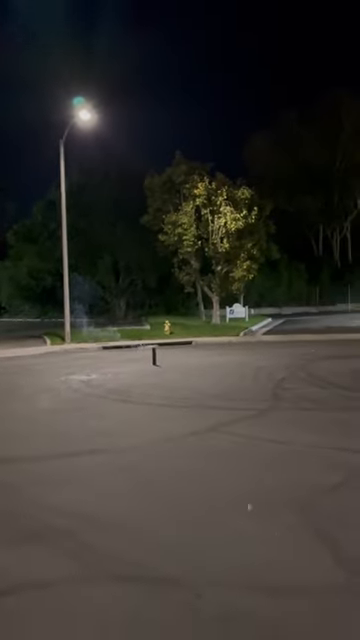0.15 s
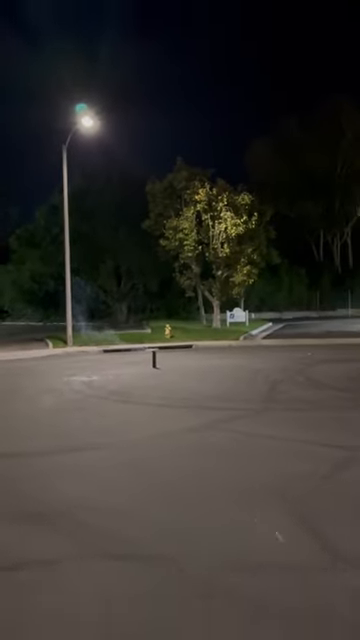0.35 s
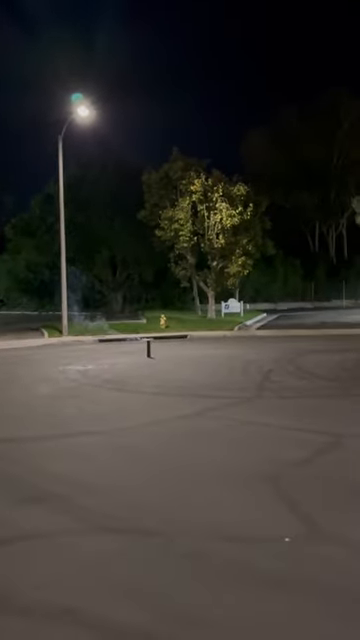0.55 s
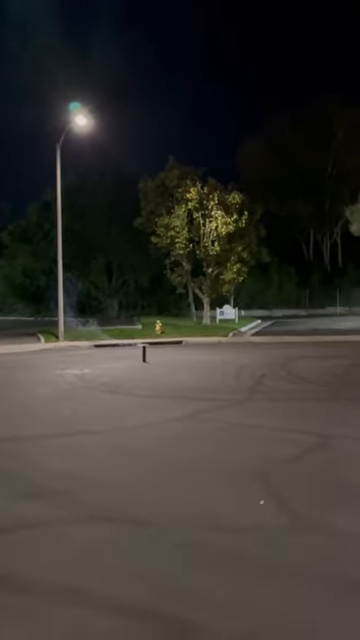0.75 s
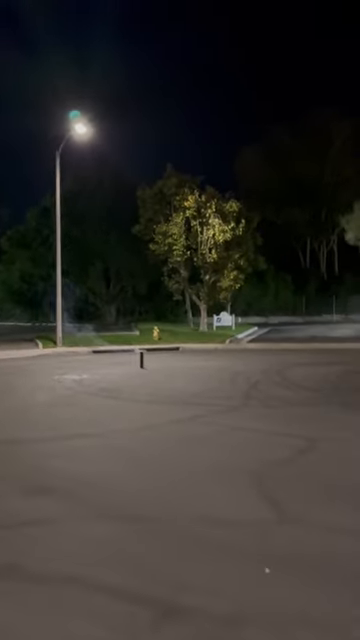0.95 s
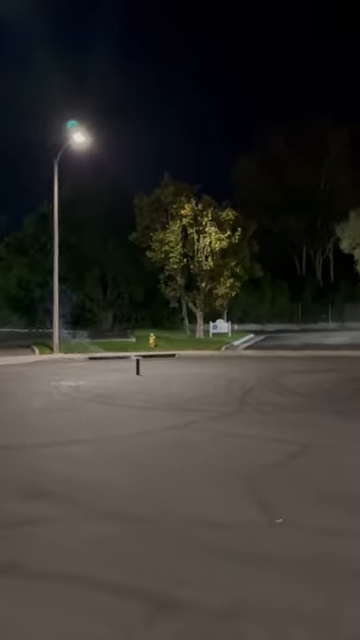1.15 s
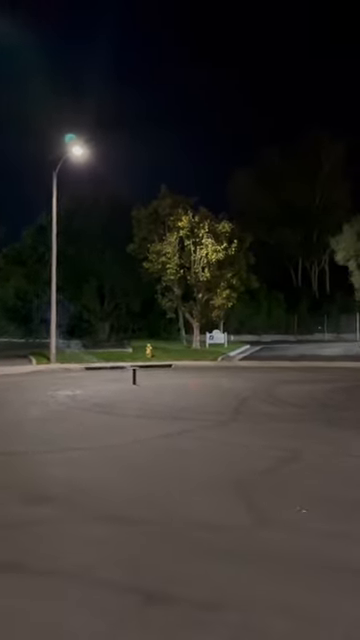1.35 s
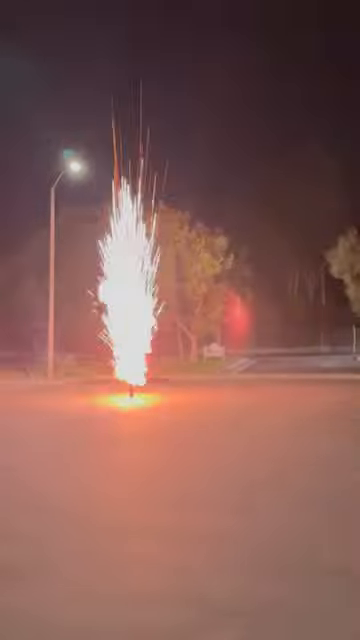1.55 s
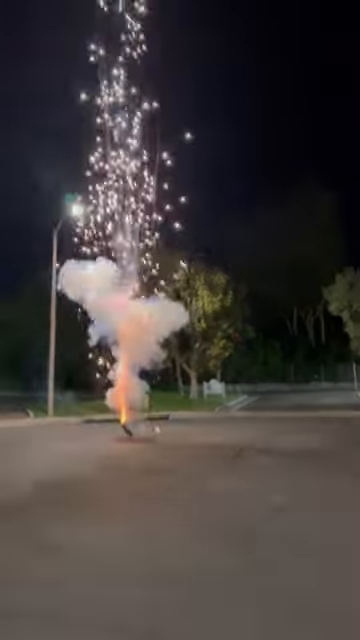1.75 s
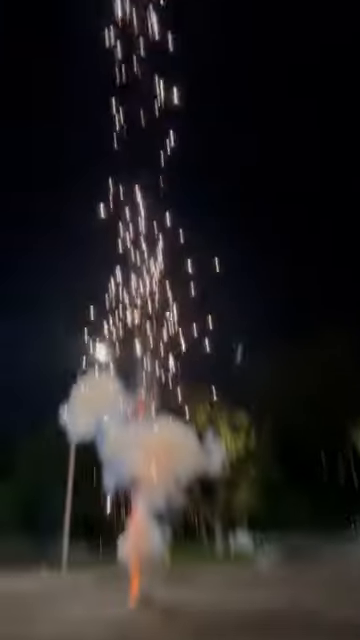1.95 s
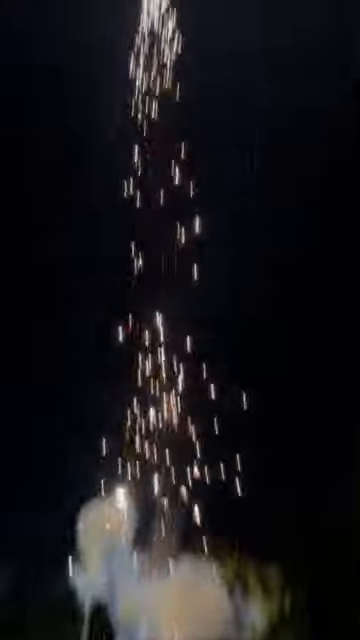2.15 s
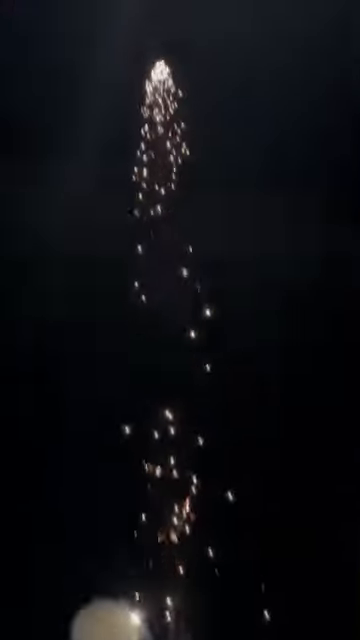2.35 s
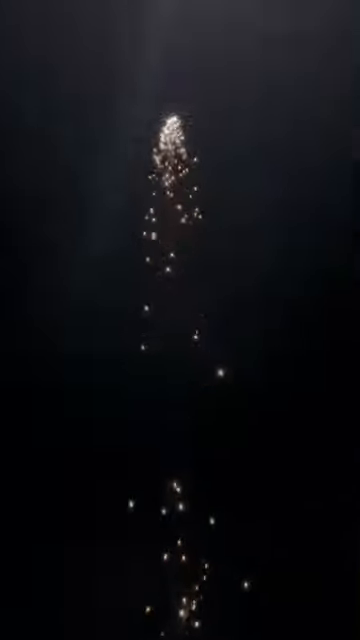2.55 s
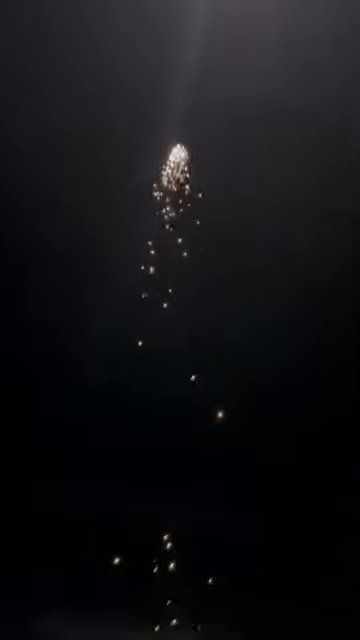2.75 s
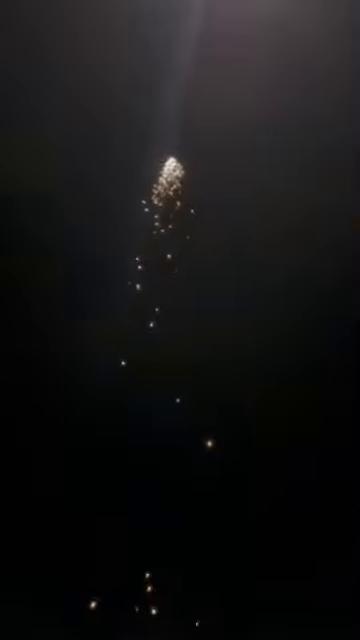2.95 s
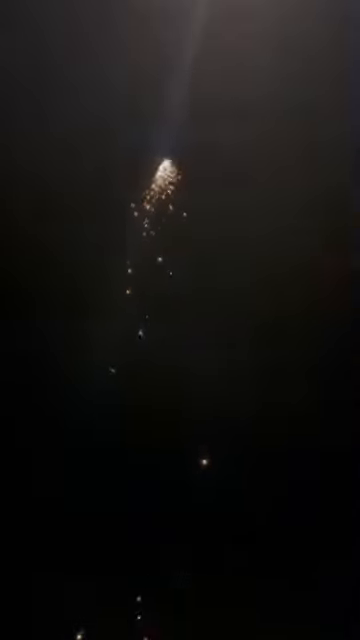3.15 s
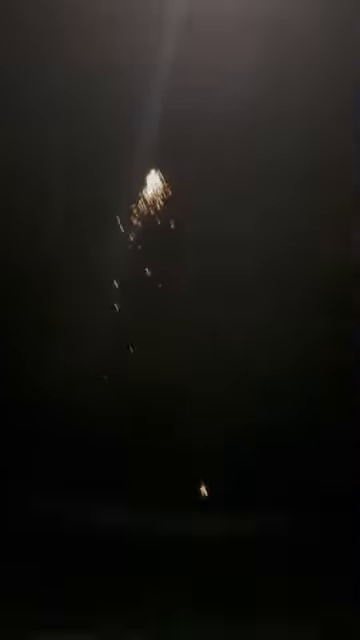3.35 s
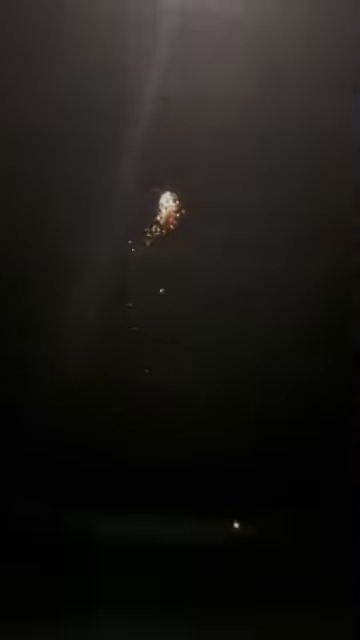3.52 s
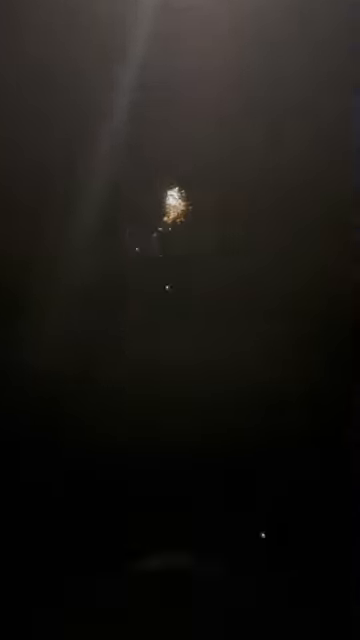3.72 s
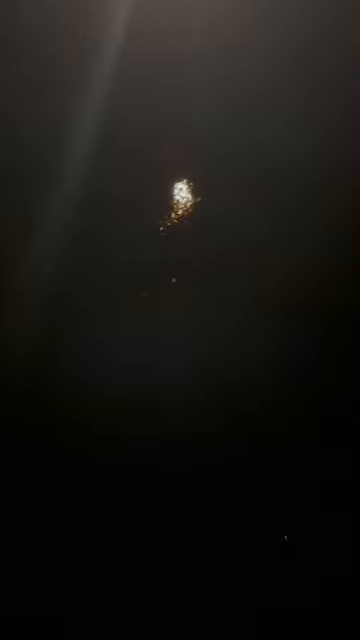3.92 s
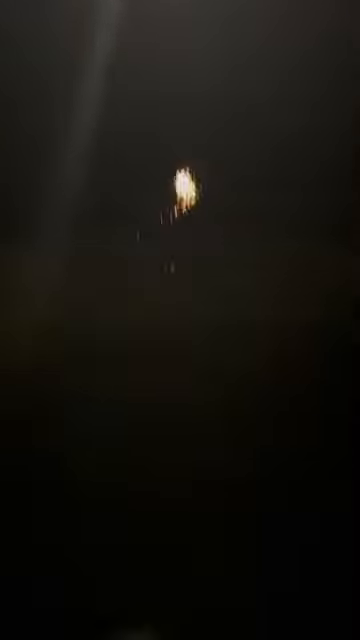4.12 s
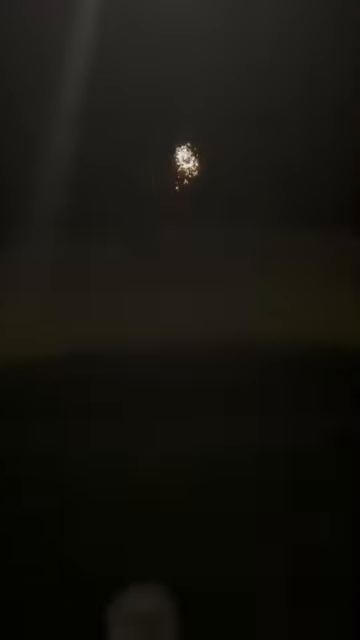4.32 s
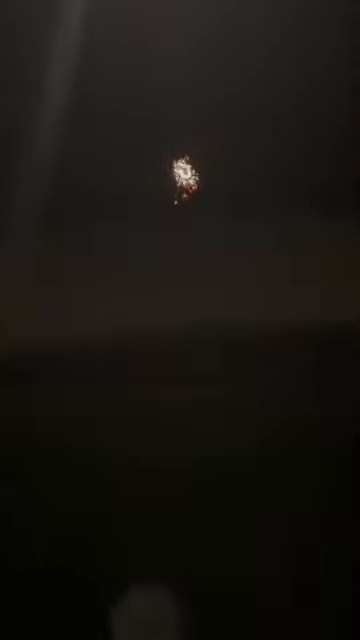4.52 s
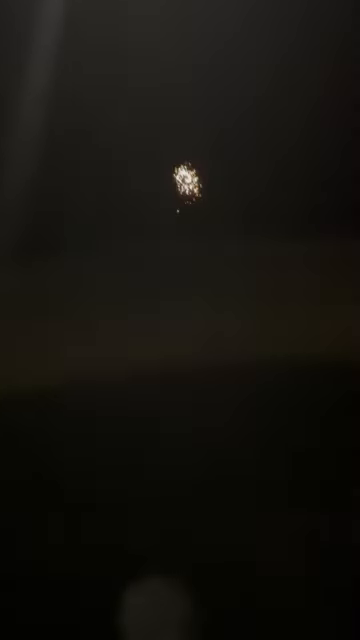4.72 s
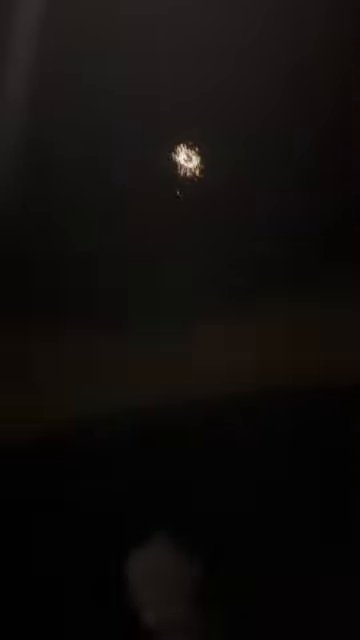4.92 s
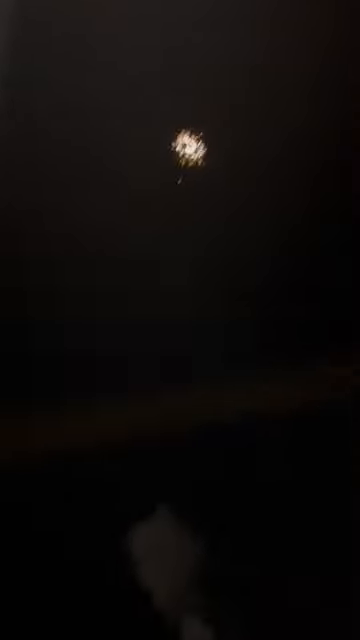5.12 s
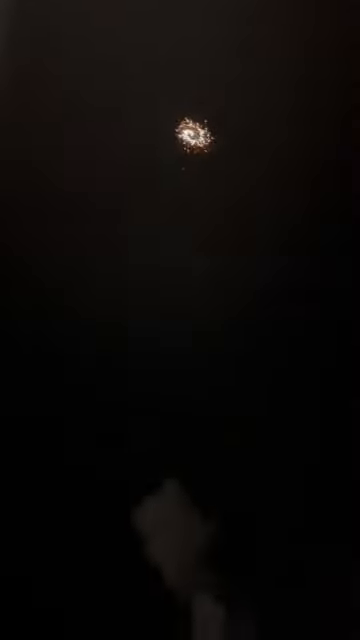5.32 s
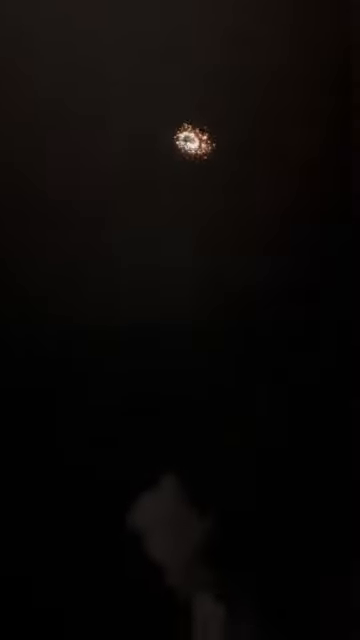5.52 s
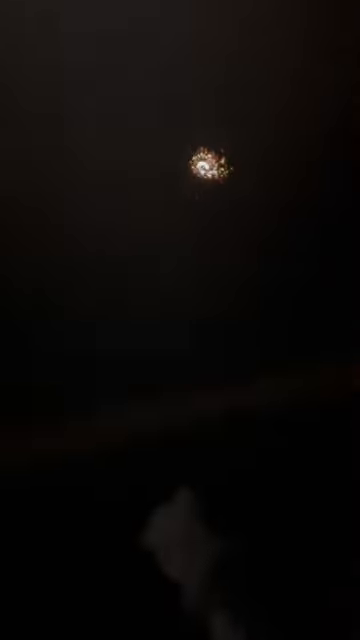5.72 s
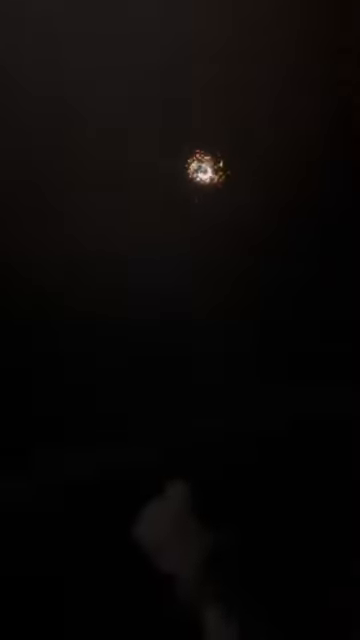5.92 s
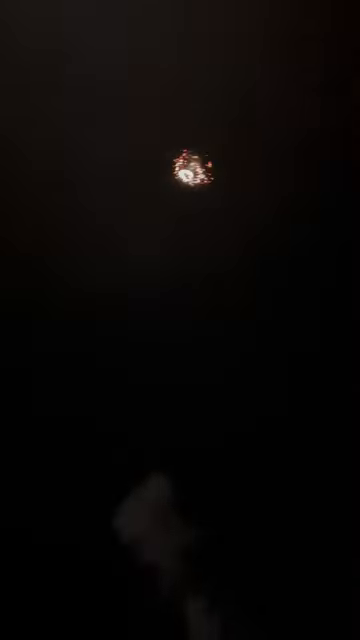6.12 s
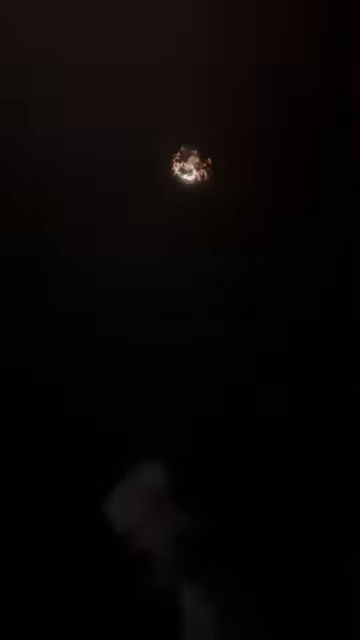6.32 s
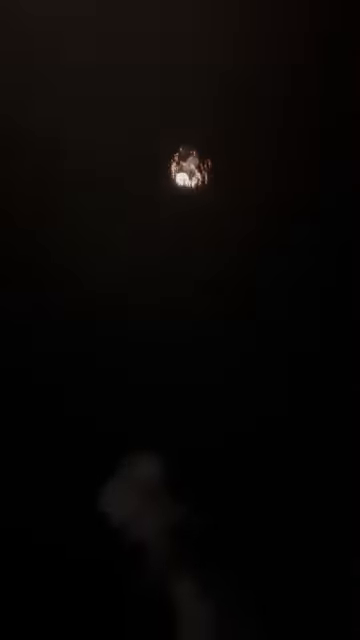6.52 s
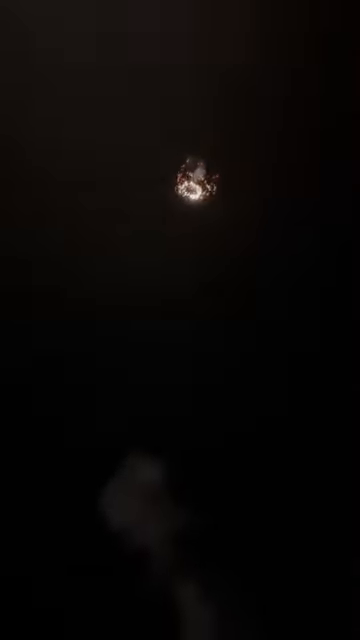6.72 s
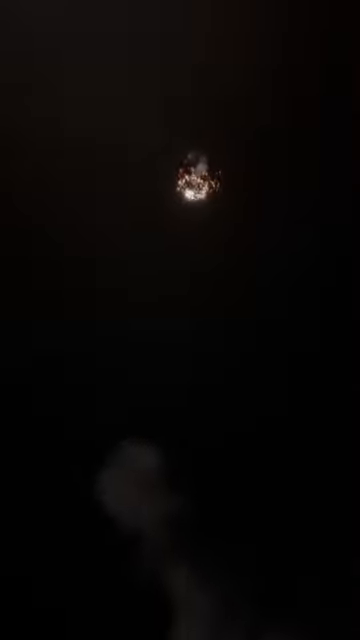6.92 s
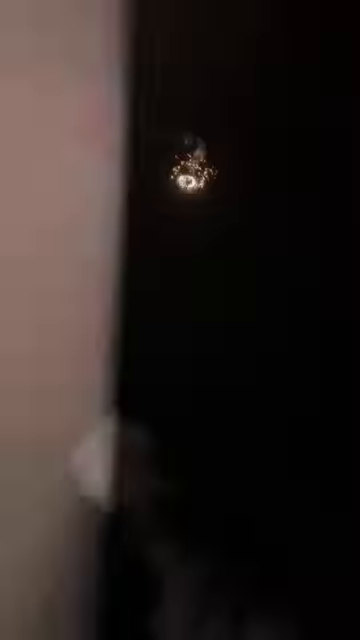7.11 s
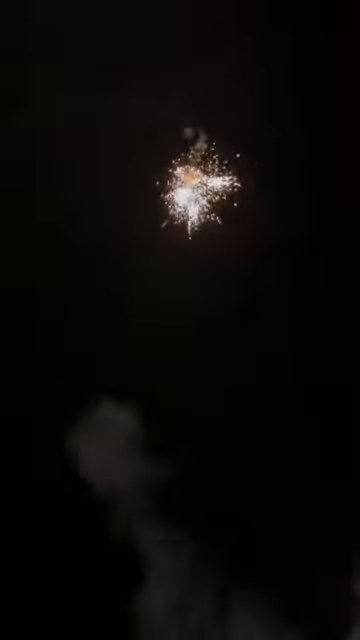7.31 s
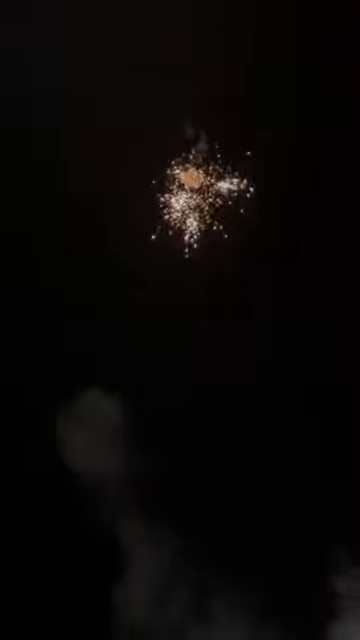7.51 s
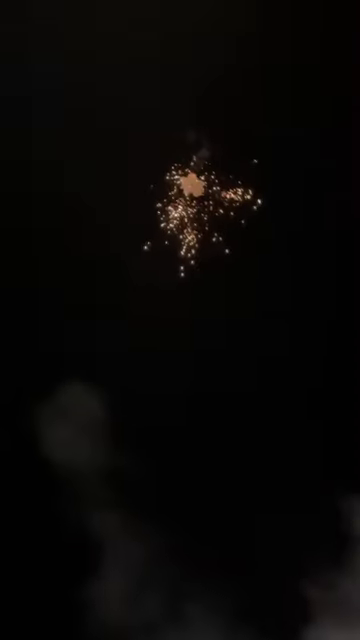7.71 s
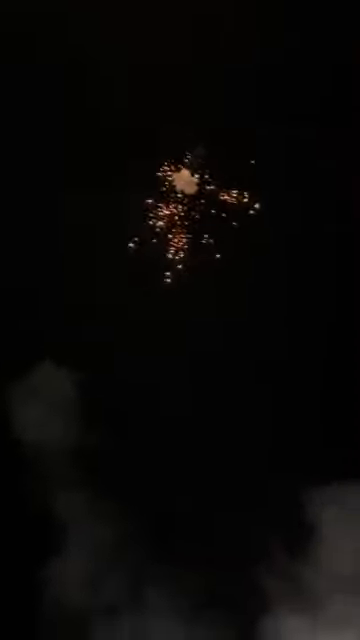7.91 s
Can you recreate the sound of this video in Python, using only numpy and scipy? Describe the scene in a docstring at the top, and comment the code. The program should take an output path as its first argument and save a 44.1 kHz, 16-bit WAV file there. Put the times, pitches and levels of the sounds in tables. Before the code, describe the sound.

A quiet paved street at night, heard on a stereo phone some distance away: soft wind rumble, a distant wash, dull knocks near 0.2 and 0.6 s and small spark ticks. At 1.5 s a mortar fires with a sharp crack, a second harder one moments later, and a clipped thump. Noise rolls back from trees and houses, losing brightness over the next second or two, with a low slap around 2.7 s. From about 1.65 s a shrill whistle climbs away, near 3 kHz, fluttering fast and rough, then smoother with a slowing warble. It sinks toward 1.6 kHz, weaker around 4.2 s, then stronger and brighter with gas hiss after 5.5 s. A faint knock comes near 6.8 s. At 7.4 s the whistle ends in a crack and deep thump; heavy low rumble swells and is still rolling at the end, about 8 s.

```python
"""Paved street at night, light wind, a phone with two microphones some way off: first a few dull knocks and sparks.
At 1.5 s a firework shell leaves its mortar; shock fronts crack and thump, and noise rolls back from trees and houses.
The shell tumbles upward on a pulsing whistle with overtones and jet hiss, sinking as the fuel burns down the tube.
At 7.4 s it bursts overhead with a new crack, thump and roll; the phone rounds the blast peaks and cuts the top."""
import sys
import numpy as np
from scipy import signal
from scipy.fft import rfft, irfft, next_fast_len
from scipy.io import wavfile
from scipy.ndimage import uniform_filter1d

SR = 44100
rng = np.random.default_rng(int(sys.argv[2]) if len(sys.argv) > 2 else 0)


def transcribe(signal):
    """Save signal, clipped to [-1, 1], as a 16-bit WAV file at the path in sys.argv[1]."""
    frames = np.atleast_2d(signal).T
    limited = np.clip(frames, -1, 1)
    pcm = np.round(limited * 32767).astype(np.int16)
    wavfile.write(sys.argv[1], SR, pcm)


N = 351036
T = np.arange(N) / SR


def undb(db):
    """Decibels to gain."""
    return 10 ** (np.asarray(db) / 20)


def unit(x):
    """Scale to rms 1."""
    return x / np.sqrt(np.mean(x ** 2) + 1e-18)


def peak_one(x):
    """Scale to a peak of 1."""
    return x / np.abs(x).max()


def curves(rows, t):
    """Each column of a table, joined by straight lines in time."""
    s, *columns = np.transpose(rows)
    return [np.interp(t, s, c) for c in columns]


def response(points, size):
    """Gain at each frequency of a transform of this size."""
    hz, db = np.transpose(points)
    bins_hz = np.arange(size // 2 + 1) * SR / size
    return undb(np.interp(np.log(bins_hz + 1), np.log(hz), db))


def colour(x, points):
    """Filter a sound by a table of gains over frequency."""
    size = next_fast_len(x.shape[-1], True)
    return irfft(rfft(x, size) * response(points, size), size)[..., :x.shape[-1]]


def band(x, lo_hz, hi_hz, order=2):
    """Band-pass filter."""
    edges_hz = [lo_hz, min(hi_hz, SR / 2 - SR / 20)]
    return signal.sosfilt(signal.butter(order, edges_hz, "band", fs=SR, output="sos"), x)


def walk(rate, size=N):
    """Random wandering with a spread near 1, through this many random points a second."""
    u = np.arange(size) / SR * rate
    knots = rng.standard_normal(N // 20)
    return np.sqrt(3 / 2) * np.interp(u, np.arange(len(knots)), knots)


def add(out, s, x):
    """Mix a short sound in at time s."""
    i = int(s * SR)
    out[:, i:i + x.shape[-1]] += x[..., :N - i]


def wash(t, levels_db, points, spread, grain_db, fade_db):
    """Stereo noise as rumble, body and treble; the treble loses fade_db a second."""
    mid, side = rng.standard_normal((2, len(t))) * undb(grain_db * walk(350, len(t)))
    size = next_fast_len(len(t), True)
    hz = np.arange(size // 2 + 1) * SR / size
    wide = np.outer([1, -1], rfft(side, size) * response(spread, size))
    spectrum = (rfft(mid, size) + wide) * response(points, size)
    low = 1 / (1 + (hz / 180) ** 8)
    high = 1 - 1 / (1 + (hz / 3300) ** 4)
    rumble, body, treble = (irfft(spectrum * share, size)[:, :len(t)] for share in (low, 1 - low - high, high))
    rumble_db, body_db = levels_db
    # an even rumble without stray surges
    rumble = rumble / np.sqrt(uniform_filter1d((rumble ** 2).mean(0), size=SR // 14) + 1e-18)
    body_rms = np.std(band(body.mean(0), 200, 1400))
    upper = (body + treble * undb(-fade_db * (t - t[0]))) / body_rms
    return rumble * undb(rumble_db) + upper * undb(body_db)


# open street air around the launch, then under the climbing shell: time_s, wind_rumble_db, distant_wash_db
AIR_BEFORE = [(0, -42, -50), (.5, -46.5, -50.5), (.7, -42, -49), (1.45, -36.5, -51.5)]
AIR_AFTER = [(3.5, -56, -65), (4.1, -60, -68), (5.2, -58, -68), (5.9, -51.5, -61), (7.38, -47, -58)]
# tint of the air before, then under the climbing shell: frequency_hz, density_db_per_hz
AIR_COLOUR = [(22, -11.5), (55, 6.5), (130, -1), (300, -5.5), (600, -15.5), (1050, -18), (1600, -30.5),
              (3000, -36.5), (5000, -48), (7500, -49), (10000, -67.5)]
HUSH_COLOUR = [(22, -13.5), (54, 1), (114, -8.5), (243, -12), (352, -19), (580, -19.5), (1100, -26.5),
               (1600, -30), (3000, -33.5), (5000, -40.5), (7500, -43), (10000, -62.5)]
# how much the air differs at the two microphones: frequency_hz, side_minus_mid_db
AIR_SPREAD = [(60, -13.5), (200, -23), (380, -13), (700, -5.5), (2400, -9.5), (4400, 3.5), (8000, 2.5)]


def night_air():
    """Wind rumble and a distant wash, both noise; they sink after the launch and slowly come back."""
    handover = np.interp(T, [1.5, 3.2], [0, 1])
    before = wash(T, curves(AIR_BEFORE, T), AIR_COLOUR, AIR_SPREAD, grain_db=1.0, fade_db=-2.0)
    after = wash(T, curves(AIR_AFTER, T), HUSH_COLOUR, AIR_SPREAD, grain_db=1.0, fade_db=2.0)
    return before * (1 - handover) ** 2 + after * handover


def noise_burst(t60_s):
    """A quarter second of noise that dies 60 dB in t60_s."""
    t = T[:SR // 4]
    return rng.standard_normal(len(t)) * undb(-60 * t / t60_s)


def knock(hz, t60_s):
    """A dying noise burst squeezed into a narrow band just below hz."""
    narrow = band(noise_burst(t60_s), hz / 1.254, hz * 0.997, order=1)
    return peak_one(band(narrow, hz / 3, hz * 3, order=2))


# dull knocks nearby and late slaps from far walls: start_s, body_peak_db, pitch_hz, noise_t60_s, edge_db (re body)
KNOCKS = [(.157, -35.5, 332, 0.19, -4.5), (.626, -34.5, 161, 0.072, -18), (.664, -31, 427, 0.15, -24),
          (2.67, -28, 182, 0.41, -24), (2.953, -37, 400, .04, -1), (3.111, -34, 598.6, .08, -3),
          (6.332, -52.5, 500, .04, -11), (6.786, -38.5, 422, 0.092, -18)]
EDGE_RATIO, EDGE_T60_S = 1.8, 0.063  # the edge of a knock has its own pitch, above the body, and decay


def knocks():
    """Each knock or slap is a narrow noise body with a higher edge on top."""
    out = np.zeros((2, N))
    for s, db, hz, t60_s, edge_db in KNOCKS:
        edge = undb(edge_db) * knock(EDGE_RATIO * hz, EDGE_T60_S)
        add(out, s, undb(db) * (knock(hz, t60_s) + edge))
    return out


# the loudest sparks: start_s, peak_db, pitch_hz
SPARKS = [(.252, -49.5, 4120), (.3462, -45.5, 3940), (.836, -42, 4070), (2.175, -50, 3000),
          (2.31, -51, 6540)]
TRAIL_S, TRAIL_DB, TRAIL_HZ = (2.4, 3.6), -62, 5800  # fainter sparks in the trail of the shell


def sparks():
    """Each spark is a tiny snap of noise, with four fainter ones at random moments in the trail."""
    out = np.zeros((2, N))
    trail = [(s, TRAIL_DB, TRAIL_HZ) for s in rng.uniform(*TRAIL_S, size=4)]
    for s, db, hz in list(SPARKS) + trail:
        snap = band(noise_burst(.007), hz / 3.2, hz * 0.99)
        snap = colour(snap, [(7500, 5), (11000, -25.0)])  # the air takes the top
        add(out, s, undb(db) * peak_one(snap))
    return out


# stronger echoes from single houses and stands of trees: peak_s, rumble_db, body_db, decay_s
ECHOES = [(1.625, -19, -49, 0.032), (1.66, -26, -26.5, .04), (1.745, -24, -42.5, .05),
          (2.0, -31.5, -33.5, 0.14), (2.289, -31.5, -54, 0.088), (2.87, -44, -52.5, 0.4),
          (7.487, -19, -30, 0.029), (7.667, -17, -30.5, 0.055), (7.808, -14, -28.5, 0.052),
          (7.942, -13.5, -37, 0.021)]


def roll(t, rumble_db, rumble_fall_db, body_db, body_fall_db):
    """Levels of rumble and body in dB: a steady slope, with a swell for each stronger echo."""
    age = t - t[0]
    power = undb([rumble_db - rumble_fall_db * age, body_db - body_fall_db * age]) ** 2
    for s, low_db, mid_db, decay in ECHOES:
        # an echo builds up in 0.4 of its decay time
        swell = np.exp(-np.maximum((s - t) / .4, t - s) / decay)
        power = power + np.outer(undb([low_db, mid_db]), swell) ** 2
    return 10 * np.log10(power)


# steady roll behind each blast (a negative fall climbs): rumble_db, rumble_fall_db_per_s, body_db, body_fall_db_per_s
LAUNCH_ROLL = (-26, 15.5, -26, 24)
BURST_ROLL = (-23, -4.5, -30.5, -9)
# tint of the street's answer to each blast: frequency_hz, density_db_per_hz
LAUNCH_COLOUR = [(22, -17), (60, 10.5), (110, -2), (200, 1.5), (330, -15), (600, -10.5), (1200, -20.5),
                 (3000, -20), (4200, -28), (6500, -28.5), (9300, -38.5), (11000, -77.5)]
BURST_COLOUR = [(22, -24), (55, 11), (90, 14.5), (170, -4.5), (300, -18.5), (600, -25), (1200, -33),
                (3000, -36), (4200, -40), (6500, -40.5), (9300, -51), (11000, -76)]
# how much the echoes differ at the two microphones: frequency_hz, side_minus_mid_db
SPREAD = [(60, -16.5), (200, -19.5), (380, -10.5), (700, -4), (1300, -9), (2400, -5.5), (4400, 1.5),
          (8000, 4)]


def echoes():
    """Both blasts roll back from ground, trees and houses as noise, duller the further it has travelled."""
    out = np.zeros((2, N))
    launch_s, burst_s = CRACKS[0][0], CRACKS[-1][0]
    t = T[int(launch_s * SR):][:5 * SR // 2]
    # only the ground answers at first
    build = np.interp(t, [1.503, 1.508, 1.575, 3.1, 3.5, 4], [.02, .5, 1, 0.98, 0.6, .2])
    grain_db = np.interp(t, [1.7, 2.4], [2.8, 1.3])  # the echoes grow denser and blend
    lumps_db = 0.9 * walk(25, len(t))  # the launch echoes come back in uneven bunches
    levels_db = roll(t, *LAUNCH_ROLL) + lumps_db
    add(out, launch_s, build * wash(t, levels_db, LAUNCH_COLOUR, SPREAD, grain_db, fade_db=26))
    t = T[int(burst_s * SR):]
    build = 1 - np.exp(-(t - t[0]) / 0.003)
    levels_db = roll(t, *BURST_ROLL)
    add(out, burst_s, build * wash(t, levels_db, BURST_COLOUR, SPREAD, grain_db=0.5, fade_db=38.5))
    return out


WHISTLE_ON_S, BURST_S = 1.64, 7.424
# the shell tumbles fast at first; the air brakes it toward a slow, steady spin
FACING_S, FACING_SPIN_HZ, FINAL_SPIN_HZ, BRAKE_S = 1.851, 16.878, 2.043, 1.1987


def turning():
    """Angle of the tumbling shell in radians, zero at FACING_S when its nozzle faces the listener."""
    age = np.maximum(T, WHISTLE_ON_S) - FACING_S
    extra_turns = (FACING_SPIN_HZ - FINAL_SPIN_HZ) * BRAKE_S * (1 - np.exp(-age / BRAKE_S))
    return 2 * np.pi * (FINAL_SPIN_HZ * age + extra_turns)


# whistle before the tumbling bends it: time_s, pitch_hz
PITCH = [(1.65, 3061), (1.9, 2891), (2.2, 2607), (2.9, 2405), (3.6, 2226), (3.95, 2238), (4.42, 2098),
         (4.75, 1999), (5.5, 1890), (5.75, 1873), (6.27, 1767), (6.5, 1799), (6.8, 1737), (6.97, 1652),
         (7.23, 1669), (7.4, 1577)]
# how hard the whistle burns: time_s, level_db, overtones_db
BLOW = [(1.65, -40.5, -3), (1.77, -39.5, -12), (1.95, -33, -25.5), (2.15, -38.5, -21.5), (2.85, -38, -30.5),
        (3.7, -41, -29.5), (4.2, -48, -25.5), (5.2, -45.5, -18.5), (5.4, -41.5, -15.5),
        (5.75, -37.5, -15.5), (5.95, -40, -17), (6.25, -33.5, -15.5), (6.55, -33.5, -14.5),
        (6.75, -37, -14), (7.1, -33.5, -15), (7.28, -38, -11), (7.4, -29.5, -14.5)]
# how ragged the burn is: time_s, pitch_jitter_share, level_flutter_db, unequal_pulses_db
RAGGED = [(1.7, .03, 4.5, 11.5), (2.15, .010, 3.5, 1), (3.7, .0055, 1, 1), (4.1, 0.0069, 2.5, -12),
          (5.2, .006, 2, -2), (6.5, 0.0048, 1, -10), (7.35, .0075, 1.5, 2.5)]
# where the shell stands from the phone: time_s, left_minus_right_db
BEARING = [(2.5, 1), (3.6, -2), (4.6, -2), (5.7, -1.5), (6.7, -1)]
# each turn of the nozzle toward the listener: time_s, pitch_swing_share, level_swing_db, overtone_swing_db
TUMBLE = [(2.2, .025, 2, -3.5), (3.0, 0.026, 0.2, 4), (3.85, 0.02, 1.4, 2.5), (4.35, .005, 2, 0.5),
          (5.7, 0.0033, 3.5, 0.5), (6.6, .004, 1.2, 0.5)]
# what the air and the microphone leave of the overtones: frequency_hz, gain_db
OVERTONE_COLOUR = [(3300, -2.5), (3800, -1), (4300, 1), (5200, 0.5), (6500, -6.5), (7400, -10), (8300, -21),
                   (9500, -26), (11000, -46.5)]
# hiss of the gas jet: frequency_hz, density_db_per_hz
JET_COLOUR = [(400, -14), (1000, -14), (2200, 12.5), (3300, 0.5), (4500, 4.5), (6300, -6), (8000, -15.5),
              (10000, -38.5)]
CREST, LEAN = .2, .25  # sharp crests and flat troughs; the pitch jumps up and slides back
SCATTER_T60_S = 1.1


def whistle():
    """Pulsing combustion sounds a lengthening tube; tumbling swings pitch and level, and gas hisses along."""
    pitch, = curves(PITCH, T)
    level_db, overtone_db = curves(BLOW, T)
    jitter, flutter_db, unequal_db = curves(RAGGED, T)
    pan_db, = curves(BEARING, T)
    swing, swell_db, bright_db = curves(TUMBLE, T)
    turn = turning()
    facing = np.cos(turn) + CREST * np.cos(2 * turn)
    warble = swing * (facing - LEAN * np.sin(2 * turn))
    hz = pitch * (1 + warble + jitter * walk(260) + 0.0037 * walk(35))
    # no two pulses are evenly spaced
    phase = 2 * np.pi * np.cumsum(hz) / SR + 7 * jitter * walk(1100)

    def carried_db(k):
        """What reaches the phone at k times the pitch."""
        return np.interp(k * pitch, *np.transpose(OVERTONE_COLOUR))

    overtones = 0
    for k, db in enumerate([-3.0, -9.5, -12.5, -15.0], 2):
        wander_db = 3.8 * walk(23) + flutter_db * walk(150)
        overtones = overtones + undb(db + carried_db(k) + wander_db) * np.sin(k * phase)
    # alternate pulses are unequal, which puts faint ragged lines between the harmonics
    halves = 0
    for k, db in zip([.5, 1.5, 2.5, 3.5], [-32.0, -31, -47.5, -40.0]):
        halves = halves + undb(db + carried_db(k)) * np.sin(k * phase)
    halves = walk(120) * halves
    upper = undb(overtone_db) * overtones
    tone = np.sqrt(2) * (np.sin(phase) + undb(bright_db * facing) * (upper + undb(unequal_db) * halves))
    # the jet spits unevenly and follows the overtones
    jet_db = -12.5 + overtone_db + 3.5 * walk(14)
    jet = undb(jet_db) * unit(colour(rng.standard_normal((2, N)), JET_COLOUR))
    burning = np.clip((T - WHISTLE_ON_S) / 0.044, 0, 1) * (T < BURST_S)
    gain = undb(level_db + swell_db * facing) * burning
    direct = tone * gain * undb(flutter_db * walk(90))
    # the trees scatter a faint tail, rich in overtones and strongest while the shell is low
    t = T[:SR]
    tail = rng.standard_normal((2, SR)) * undb(-60 * t / SCATTER_T60_S) * (t > .03)
    to_trees = (direct + undb(4.5) * gain * upper) * undb(np.interp(T, [1.8, 3, 5], [-3, -16, -24]))
    scattered = signal.fftconvolve(to_trees[None], unit(tail) / np.sqrt(SR), axes=1)[:, :N]
    # the direct sound reaches the left microphone first
    left, right = direct * undb(pan_db / 2), np.roll(direct, 1) * undb(-pan_db / 2)
    return np.array([left, right]) + jet * gain + scattered


# sharp fronts of the launch and the burst: start_s, level_db, length_s, left_right_likeness (0-1)
CRACKS = [(1.5027, -7, 0.002, .95), (1.512, -29, 0.0015, 0.4), (1.543, -7.5, 0.0011, 0.8),
          (1.558, -9.5, 0.011, 0), (7.4187, -25, 0.0061, 0.05), (7.4262, -12, 0.0032, 0)]
# tint of the cracks: frequency_hz, density_db_per_hz
CRACK_COLOUR = [(150, -17.5), (600, 7.5), (1500, -2), (2900, 0.5), (4200, -9), (6000, -7.5), (9500, -18),
                (12500, -31.5), (15000, -20)]


def cracks():
    """Each shock front is a short tearing burst of noise."""
    out, t = np.zeros((2, N)), T[:SR // 10]
    for s, db, length, alike in CRACKS:
        mid, side = unit(colour(rng.standard_normal((2, len(t))), CRACK_COLOUR))
        shape = np.minimum(t / 0.00058, 1) * np.exp(-np.maximum(t - length, 0) / (length / 3))
        shared = np.sqrt((1 + alike) / 2) * mid
        apart = np.sqrt((1 - alike) / 2) * np.outer([1, -1], side)
        left, right = undb(db) * shape * (shared + apart)
        add(out, s, np.array([left, np.roll(right, 2)]))  # the front passes the left microphone first
    return out


# pressure swings behind the fronts: start_s, pitch_hz, level_db, length_s, left_minus_right_db
THUMPS = [(1.5032, 3070, -6, 0.0018, 3), (1.5052, 438, -9.5, 0.0078, 1), (1.5085, 234, -11.5, 0.0081, 0),
          (1.5425, 480, -0.5, 0.0035, 0), (1.560, 562, -8.5, 0.014, -2), (1.570, 258, -13, 0.011, -4),
          (1.581, 84.8, -9.5, 0.024, -7.5), (1.604, 408, -15.5, .008, 3), (7.4263, 592, -10, 0.0047, 9),
          (7.4286, 302, -15, 0.0078, -13), (7.436, 166, -10, 0.0095, 10), (7.443, 90, -4, 0.027, -2.5)]
PORT_LAG_S = .00035  # a thump reaches the right microphone this much later


def thumps():
    """The gas behind each shock front swings for a few cycles at most, starting with a downward push."""
    out, t = np.zeros((2, N)), T[:SR // 10]
    for s, hz, db, length, pan_db in THUMPS:
        age = np.clip(t - np.array([[0], [PORT_LAG_S]]), 0, length)
        swell = np.sin(np.pi * (age / length) ** 0.56)  # rises faster than it dies
        gain = undb(db + np.array([[pan_db], [-pan_db]]) / 2)
        add(out, s, -gain * swell * np.sin(2 * np.pi * hz * age))
    return out


def scene():
    """Launch, flight and burst over the night air."""
    return night_air() + knocks() + sparks() + echoes() + whistle() + cracks() + thumps()


def record(dry):
    """The phone rounds the loudest peaks and cuts the top above 15.8 kHz."""
    rounded = dry / (1 + dry ** 4) ** (1 / 4)
    return signal.sosfilt(signal.ellip(8, .2, 70, 15800, fs=SR, output="sos"), rounded)


dry = scene()
out = record(dry)
transcribe(out)
```